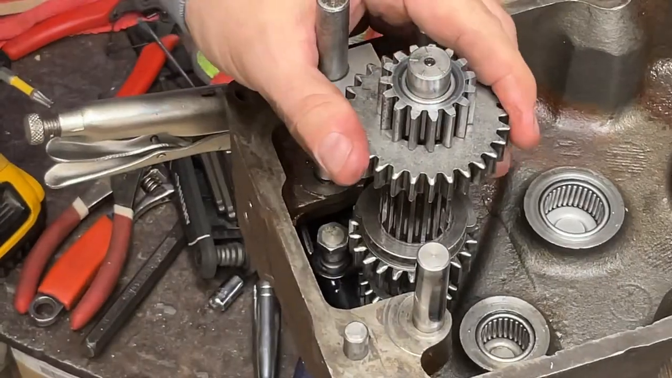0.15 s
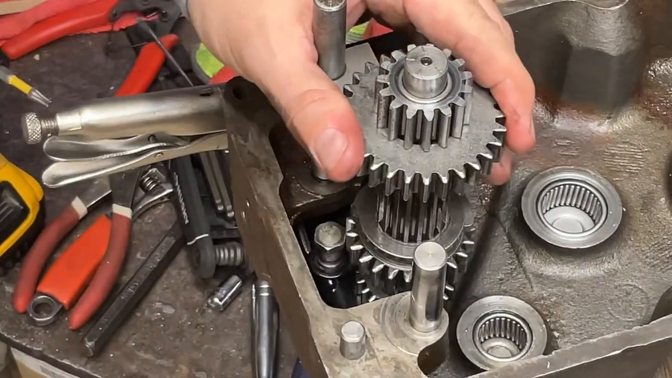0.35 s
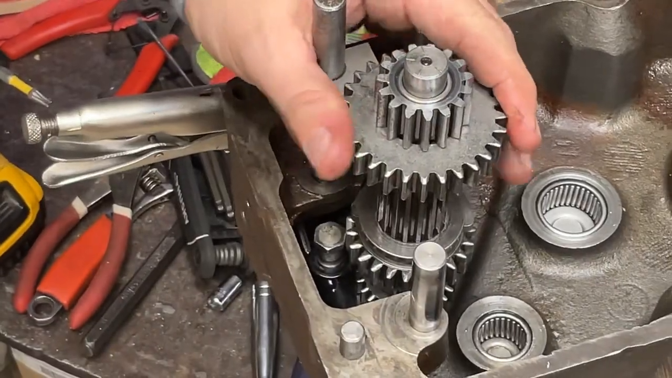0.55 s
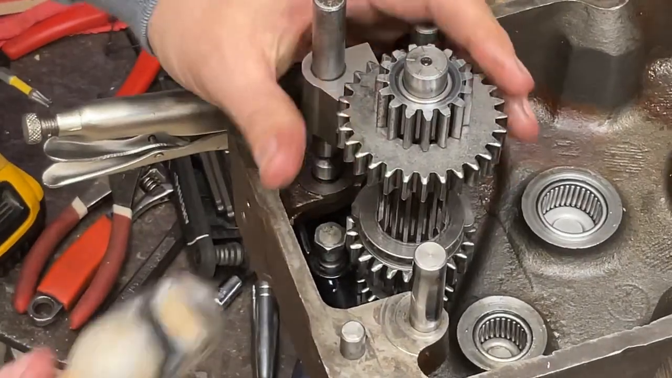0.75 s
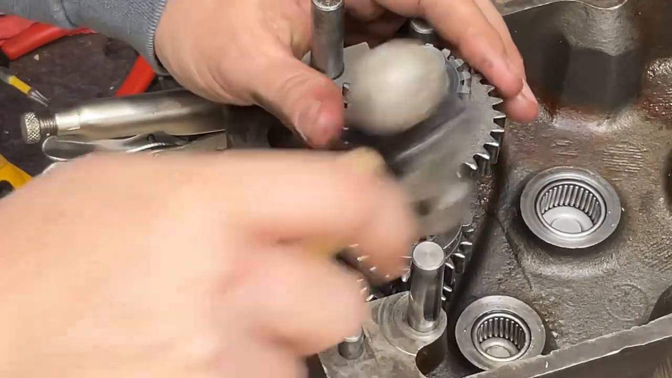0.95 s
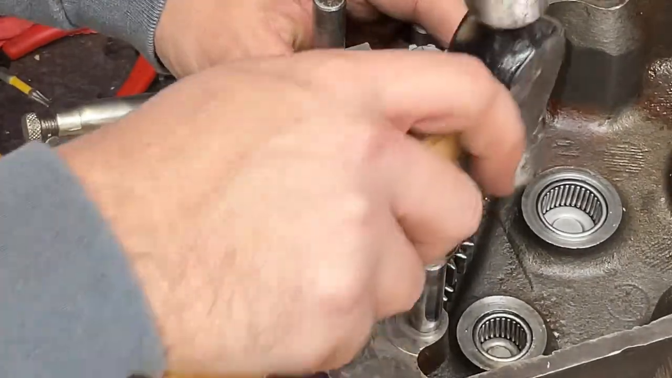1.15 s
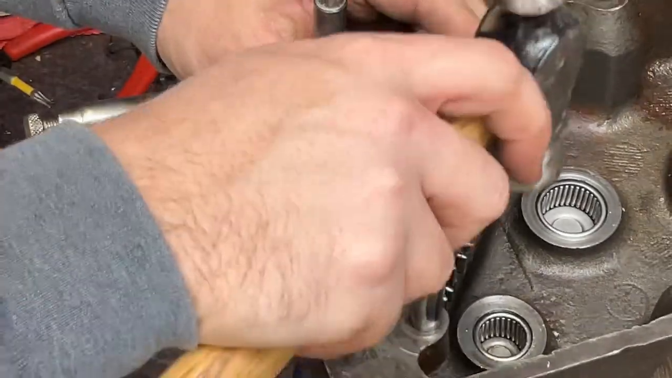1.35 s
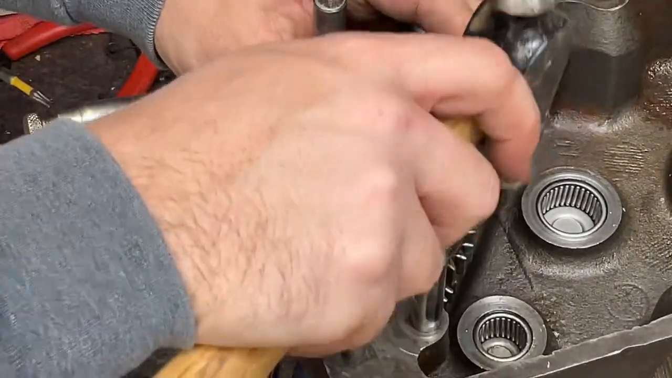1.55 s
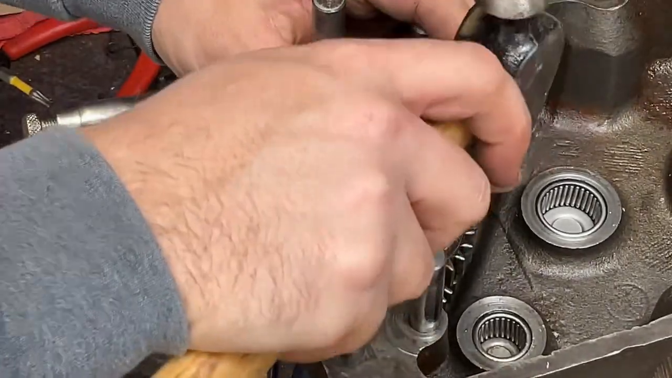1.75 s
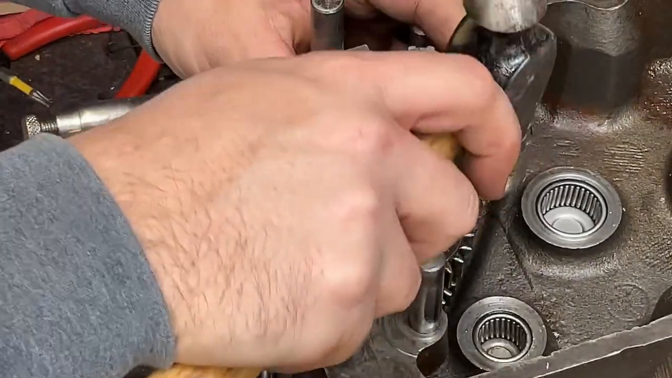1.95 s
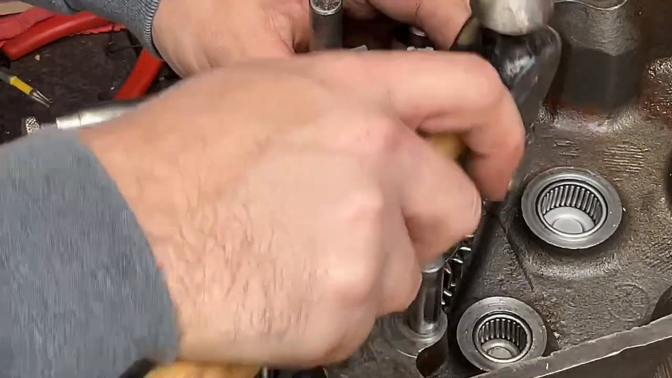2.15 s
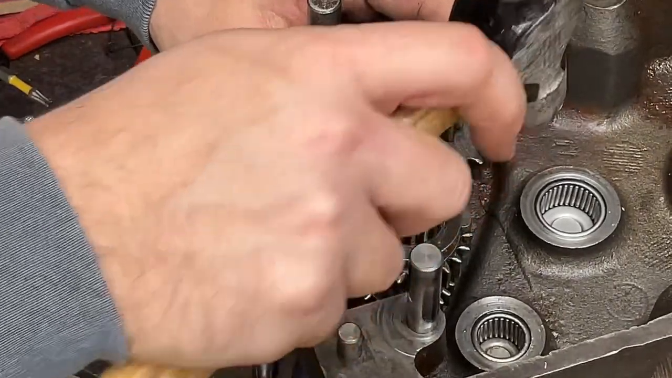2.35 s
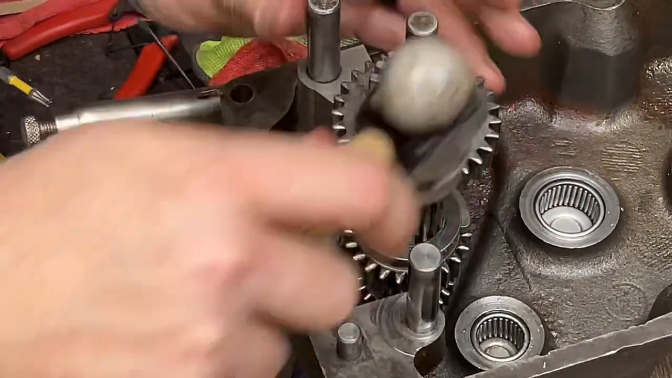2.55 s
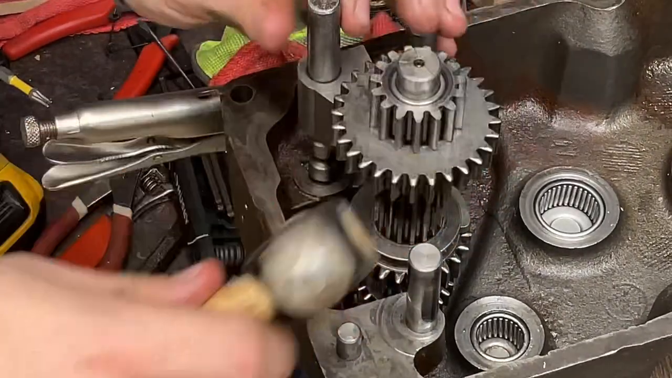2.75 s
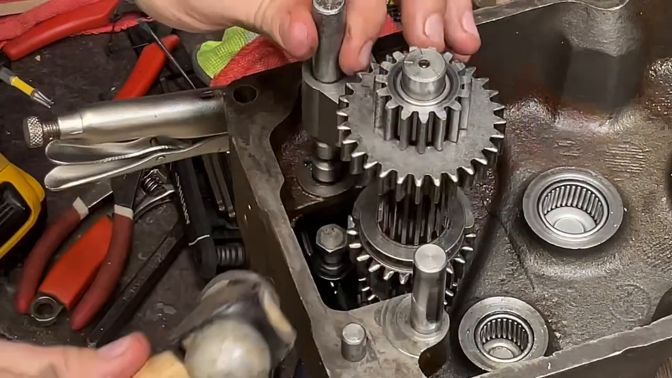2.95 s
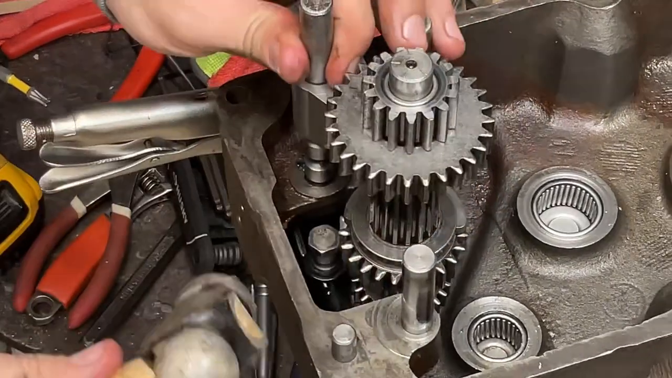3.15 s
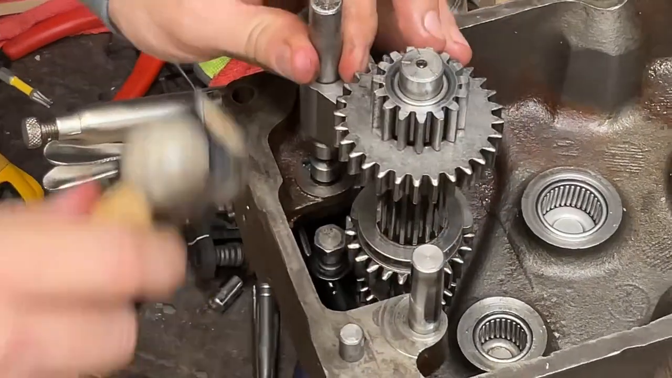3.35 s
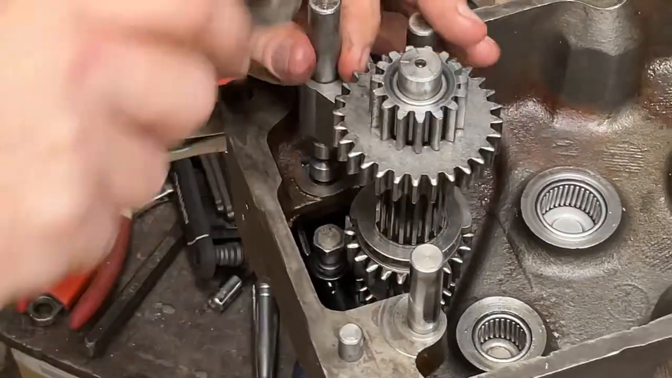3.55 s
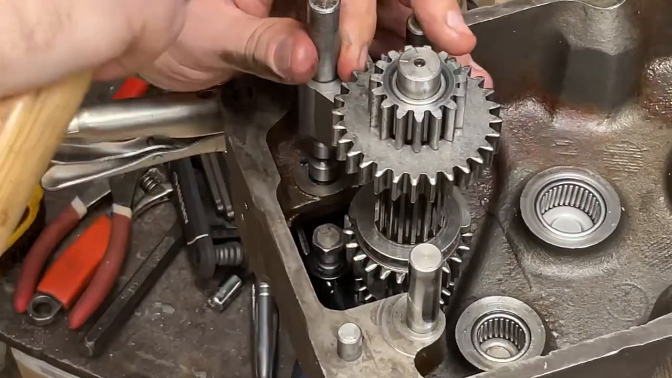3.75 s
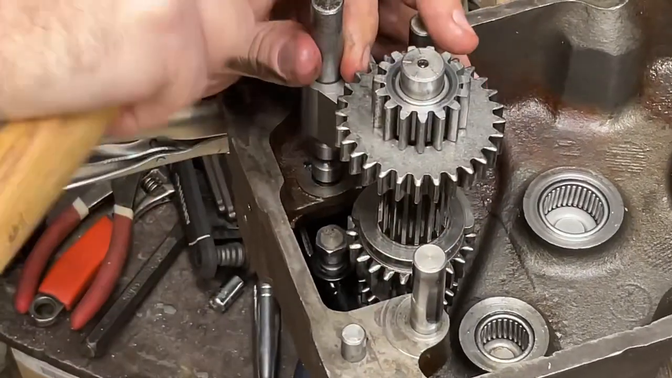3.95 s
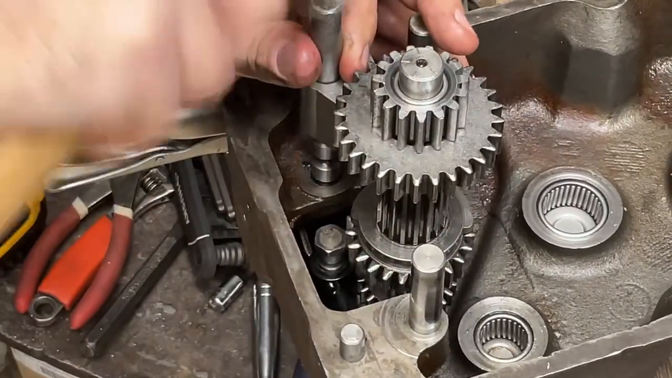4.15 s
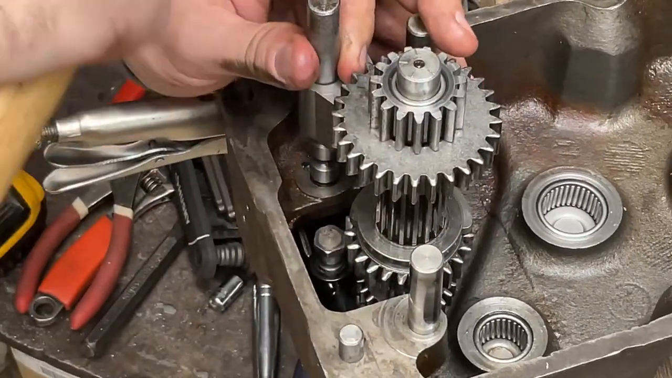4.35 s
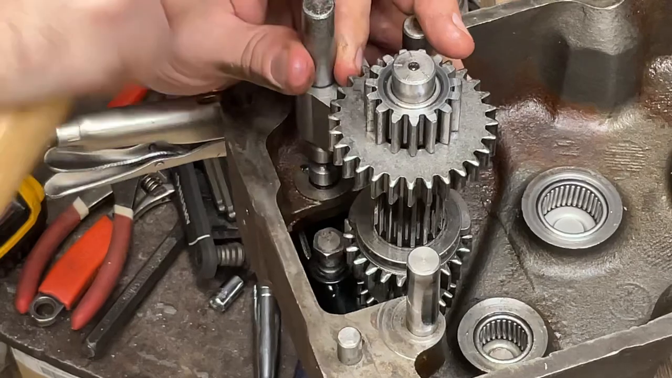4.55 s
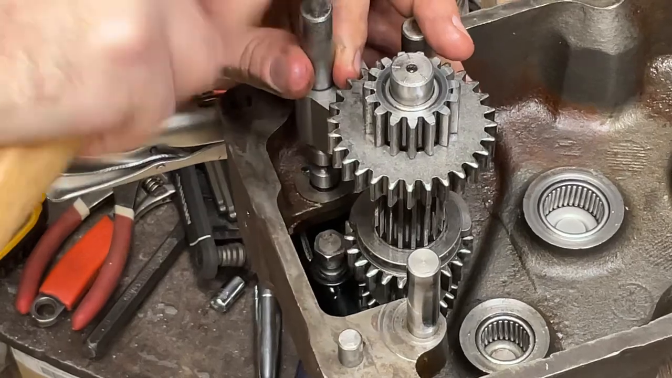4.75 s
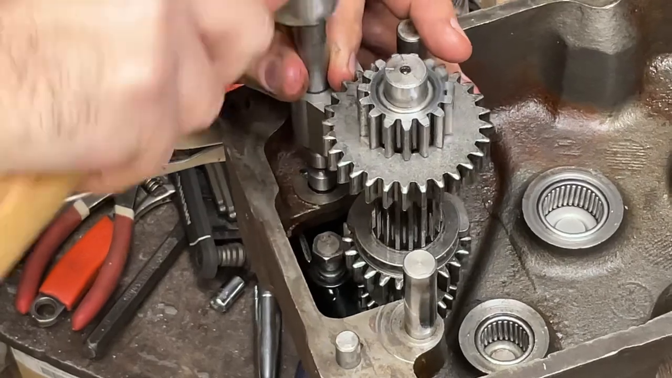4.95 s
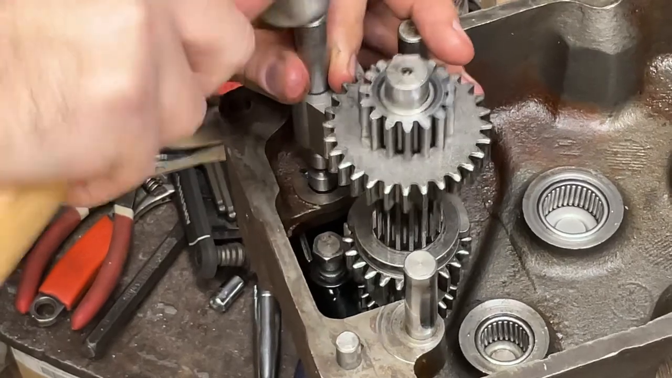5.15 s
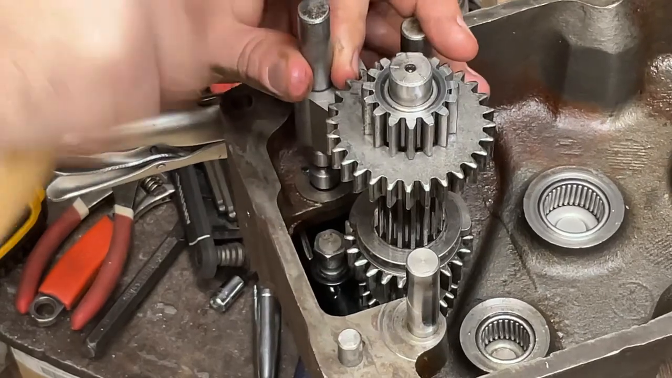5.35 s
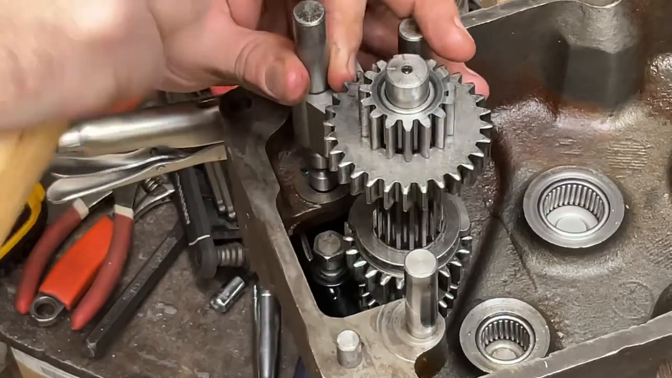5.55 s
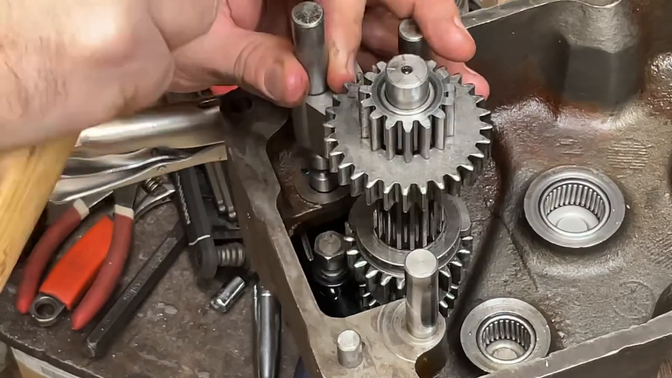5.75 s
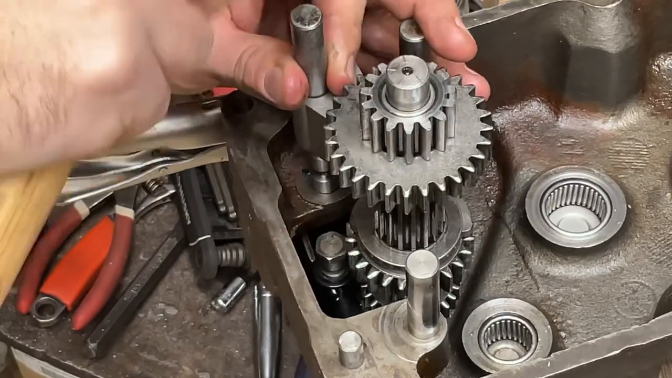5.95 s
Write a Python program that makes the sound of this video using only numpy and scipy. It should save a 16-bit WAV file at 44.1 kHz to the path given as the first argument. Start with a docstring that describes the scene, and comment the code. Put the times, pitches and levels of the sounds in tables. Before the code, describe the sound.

A hammer taps a steel gear shaft five times, then after dull hand bumps strikes a rod into a cast metal case with ten firm, even blows.

```python
"""A mains hum and room air fill a small workshop; a hammer lightly taps a steel gear shaft five times.
The hands shift on the case with dull bumps; the hum sinks under a brief low drone.
Ten firm blows then drive a shift rod into the cast gearbox case.
Each strike sums a shaped noise clank, decaying sines for case and steel, and a diffuse noise echo.
Hum and drone are sines; air and hands are coloured noise. The microphone adds narrow dips."""
import sys
import numpy as np
from scipy import signal
from scipy.fft import rfft, irfft, next_fast_len
from scipy.io import wavfile

SR = 44100
rng = np.random.default_rng(int(sys.argv[2]) if len(sys.argv) > 2 else 0)


def transcribe(signal):
    """Save signal, clipped to [-1, 1], as a 16-bit WAV file at the path in sys.argv[1]."""
    frames = np.atleast_2d(signal).T
    limited = np.clip(frames, -1, 1)
    pcm = np.round(limited * 32767).astype(np.int16)
    wavfile.write(sys.argv[1], SR, pcm)


N = 268569
T = np.arange(N) / SR
RING_T = T[:SR // 2]

# room air spectrum: (frequency [Hz], relative level [dB])
AIR_COLOUR = [(15, -26), (28, 3.5), (60, -0.5), (250, -4.5), (450, -5), (800, -11.5), (1500, -16),
              (2500, -25), (3600, -26), (4600, -34.5), (5600, -39.5), (7500, -45), (11000, -48),
              (16000, -52.5)]
# mains hum partials: (frequency [Hz], relative level [dB])
HUM_PARTIALS = [(120, 0.5), (240, -19.5), (252, -13), (360, -21.5)]
# light taps on the gear shaft: (time [s], level [dB], contact bite [dB], free ring of the steel [dB])
TAPS = [(1.2643, -17, -10, -47), (1.5116, -0.5, -2.5, -32.5), (1.7161, 2, 2, -44), (1.9272, 1, 6, -35.5),
        (2.1094, -2.5, 1.5, -47)]
# firm blows on the rod; more thud as it gives way further: (time [s], level [dB], thud [dB])
BLOWS = [(3.9156, 0, -2.5), (4.1941, 0.5, 1.1), (4.4490, -0.1, 2), (4.6974, 0.55, 2), (4.9373, 0.7, 0.5),
         (5.1741, 0.6, 0), (5.4044, 0.4, -0.3), (5.6266, 0.56, -1), (5.8429, 1.8, -8), (6.0526, 1.5, -3)]
# case modes struck through the gear shaft: (frequency [Hz], relative level [dB], t60 [s])
SHAFT_MODES = [(366, -38, .09), (1450, -42, .04), (2160, -32, .04), (2265, -32, .04), (2390, -34, .04),
               (2850, -35, .04), (3460, -34, .05), (3585, -32, .05), (3940, -34, .05), (4700, -35, .05),
               (5450, -32, .04), (6600, -41, .03)]
# case modes struck through the rod: (frequency [Hz], relative level [dB], t60 [s])
ROD_MODES = [(440, -25, .07), (502, -35, .1), (578, -33, .1), (634, -33, .11), (727, -33, .09),
             (805, -30, .1), (844, -35, .12), (911, -32, .1), (1072, -25, .08), (1500, -36, .1),
             (1757, -30, .11), (1862, -27, .13), (1938, -35, .12), (2300, -28, .05), (2590, -28, .09),
             (2665, -33, .08), (3160, -32, .08), (3520, -28, .04), (4420, -30, .07), (5290, -26, .03),
             (5900, -30, .04), (6480, -30, .05), (6750, -30, .05), (6885, -33, .08), (8880, -31, .03)]
# dense short-lived modes, via the gear shaft: (frequency [Hz], relative level [dB])
SHAFT_CLANK = [(60, -2.5), (130, -1), (400, 2.5), (900, -3.5), (1850, 1), (2150, 12), (2700, 6.5),
               (3600, 9), (4800, 5.5), (6500, -7.5), (8000, -10), (10500, -12.5), (13100, -0.5),
               (13700, -18), (16000, -18.5)]
# dense short-lived modes, via the rod: (frequency [Hz], relative level [dB])
ROD_CLANK = [(40, 3), (130, 10.4), (210, 10), (330, 14.9), (700, 18.4), (1300, 14), (2400, 17.6),
             (3600, 11.2), (5500, 8.3), (7500, 4.1), (9500, 4.6), (11500, 3.4), (13200, 4.1), (14100, 11.8),
             (15000, 1)]
# hammer head's own notes: (frequency [Hz], relative level [dB], t60 [s])
HAMMER_NOTES = [(3760, 20, .055), (10460, 0, .16)]
# gear shaft's own notes: (frequency [Hz], relative level [dB], t60 [s])
SHAFT_NOTES = [(11950, 0, .03)]
# rod's own notes: (frequency [Hz], relative level [dB], t60 [s])
ROD_NOTES = [(12330, 0, .035), (14150, -15, .1), (15350, -9, .025)]
# workshop echo: (frequency [Hz], relative level [dB], t60 before the linger factor [s])
ROOM_ECHO = [(101, 3.5, 0.26), (344, -5.5, 0.24), (760, -0.5, 0.29), (1970, -3.5, 0.3), (3730, -4, 0.29),
             (7800, -6.5, .23), (14000, -12.5, 0.22)]
# dull bumps of the hands on the case: (time [s], bell sigma [s], level [dB])
BUMPS = [(2.149, 0.016, -42.5), (3.286, .045, -46), (3.34, 0.026, -45.5)]
# spectra of the hand sounds: (frequency [Hz], relative level [dB])
BUMP_COLOUR = [(12, -15.5), (25, -0.5), (50, 3.5), (110, -3.5), (250, -18.5), (600, -37.5),
               (3000, -46.5), (10000, -80)]
BRUSH_COLOUR = [(200, -4), (600, 4), (1600, -4), (4000, -20), (9000, -30), (16000, -35)]
TOUCH_COLOUR = [(150, -7), (650, 4), (1400, -13), (3000, -28), (9000, -39)]
# microphone dips: (frequency [Hz], gain at the dip's centre [dB])
DIP_GAIN = [(1000, -25), (7100, -24), (8100, -3.5), (10200, -12)]

# the room air sinks with the hum
AIR_DB, AIR_DROP_DB = -60, -6
HUM_DB, HUM_DROP_DB, HUM_OFF_S, HUM_FADE_S = -57, -21, 3.53, 0.26
DRONE_HZ, DRONE_DB, DRONE_FROM_S, DRONE_TO_S, DRONE_FADE_S = 184, -64, 3.38, 3.86, 0.17
# the gear shaft clangs more with every tap; the hammer head rings below the shaft
TAP_THUD_DB, TAP_CLANG_DB, CLANG_DB_PER_TAP, HAMMER_UNDER_SHAFT_DB = 1.5, -4.5, 1.57, -13
# share of clank and echo power that repeats from strike to strike
REPEAT_SHARE = 0.38
# grip shift between the runs; lengths are bell sigmas
REGRIP_S, REGRIP_LENGTH_S, REGRIP_DB, REGRIP_UNEVEN_DB = 2.9, 0.53, -61, 4.5
BRUSH_S, BRUSH_LENGTH_S, BRUSH_DB = 3.47, .021, -61
TOUCH_S, TOUCH_T60_S, TOUCH_DB = 3.819, .2, -57.5
# the rod's play shrinks by 1 / e in this many blows
SEATING_BLOWS = 1.08
# (on the seated rod [dB], added by full play [dB])
ROD_CLANG_DB, ROD_BITE_DB, ROD_HAMMER_DB = (2, -3), (2.5, -13), (-70, 32)
# rod notes: final level, lack at the first blow, blows for that lack to shrink by 1 / e
ROD_NOTES_DB, ROD_MUTED_DB, RING_UP_BLOWS = -12.5, -38, 2.4
# dips at multiples of DIP_HZ; width grows with the multiple to the power DIP_WIDENING
DIP_HZ, DIP_COUNT, DIP_WIDTH_HZ, DIP_WIDENING = 1017, 10, 72, .7
TOP_HZ = 15750


def undb(db):
    """Decibels to amplitude gain."""
    return 10 ** (np.asarray(db) / 20)


def unit(x):
    """Scale to an energy of one."""
    return x / np.sqrt(np.sum(x ** 2))


def fade(t60_s):
    """Exponential decay over one ring, 60 dB down at t60."""
    return np.exp(-np.log(1000) * RING_T / t60_s)


def ramp(start_s, length_s):
    """Straight rise from zero to one."""
    return np.clip((T - start_s) / length_s, 0, 1)


def bell(middle_s, sigma_s):
    """Gaussian swell around one moment."""
    return np.exp(-.5 * ((T - middle_s) / sigma_s) ** 2)


def walk(rate_hz):
    """Slow random curve: normal draws at rate_hz, joined by straight lines."""
    points = N // 100
    return np.interp(T * rate_hz, np.arange(points), rng.standard_normal(points))


def colour(x, points):
    """Causal minimum-phase filter through (frequency [Hz], gain [dB]) points."""
    size = 2 * next_fast_len(len(x))
    hz, db = np.transpose(points)
    log_hz = np.log(np.fft.rfftfreq(size, 1 / SR) + 1)
    log_gain = np.log(undb(np.interp(log_hz, np.log(hz), db)))
    # folding the cepstrum makes the response causal
    cepstrum = irfft(log_gain)
    cepstrum[1:size // 2] *= 2
    cepstrum[size // 2 + 1:] = 0
    response = np.exp(rfft(cepstrum))
    return irfft(rfft(x, size) * response)[:len(x)]


def noise(points):
    """Coloured noise with an rms of one."""
    return unit(colour(rng.standard_normal(N), points)) * np.sqrt(N)


def room_air(gone):
    """Coloured noise with a wavering level that sinks as gone rises."""
    return noise(AIR_COLOUR) * undb(AIR_DB + AIR_DROP_DB * gone + .6 * walk(6))


def mains_hum(gone):
    """Sines wavering in level and phase, sinking as gone rises."""
    hum = np.zeros(N)
    for hz, db in HUM_PARTIALS:
        level = undb(db + .8 * walk(5))
        hum += level * np.sin(2 * np.pi * hz * T + hz / 900 * walk(4))
    return np.sqrt(2) * hum * undb(HUM_DB + HUM_DROP_DB * gone)


def low_drone():
    """One brief low sine with straight fades."""
    swell = ramp(DRONE_FROM_S, DRONE_FADE_S) - ramp(DRONE_TO_S - DRONE_FADE_S, DRONE_FADE_S)
    return np.sqrt(2) * undb(DRONE_DB) * swell * np.sin(2 * np.pi * DRONE_HZ * T)


def background():
    """Air and hum that sink together, with the drone around that moment."""
    gone = ramp(HUM_OFF_S, HUM_FADE_S)
    return room_air(gone) + mains_hum(gone) + low_drone()


def gear_taps():
    """Taps as (time [s], level, thud, clang, bite, hammer ring, shaft ring [dB])."""
    rows = []
    for k, (s, level_db, bite_db, ring_db) in enumerate(TAPS):
        clang_db = TAP_CLANG_DB + CLANG_DB_PER_TAP * k
        hammer_db = ring_db + HAMMER_UNDER_SHAFT_DB
        rows.append((s, level_db, TAP_THUD_DB, clang_db, bite_db, hammer_db, ring_db))
    return rows


def burst(grain, t60_s, spread):
    """Short shock: noise phases with a flat spectrum, then a slow fade."""
    phase = np.angle(rfft(grain * spread * fade(t60_s)))
    return unit(irfft(np.exp(1j * phase), len(grain)) * fade(10 * t60_s))


def ring(modes):
    """Decaying sines; each strike scatters their levels, pitches and signs anew."""
    hz, db, t60_s = np.transpose(modes)[:, :, None]
    scatter_db, detune, sign = rng.standard_normal((3, len(modes), 1))
    waves = np.sign(sign) * np.sin(2 * np.pi * hz * (1 + .001 * detune) * RING_T)
    return np.sum(undb(db + scatter_db) * fade(t60_s) * waves, axis=0)


def workshop(grain, gap_s, build_s, linger):
    """Diffuse echo of case, bench and walls: noise bands build up after a gap and decay."""
    hz, db, t60_s = np.transpose(ROOM_ECHO)
    log_hz = np.log(np.fft.rfftfreq(len(grain), 1 / SR) + 1)
    white = rfft(grain)
    build = 1 - np.exp(-np.maximum(RING_T - gap_s, 0) / build_s)
    echo = np.zeros(len(grain))
    for pick, band_db, band_t60_s in zip(np.eye(len(hz)), db, t60_s):
        band = irfft(white * np.interp(log_hz, np.log(hz), pick), len(grain))
        echo += undb(band_db) * band * unit(build * fade(linger * band_t60_s))
    return echo


def strike(rows, modes, clank, notes, clank_t60_s, spread_s, modes_db, echo_db, linger):
    """Hammer strikes on a shaft: dense clank, case modes, notes of the steel and room echo."""
    out = np.zeros(N + len(RING_T))
    usual = rng.standard_normal((2, len(RING_T)))
    # the shock takes a moment to spread from the shaft through the case
    spread = 1 - np.exp(-RING_T / spread_s)
    for s, level_db, thud_db, clang_db, bite_db, hammer_db, shaft_db in rows:
        # hand and hammer move between strikes, so clank and echo only partly repeat
        fresh = rng.standard_normal(usual.shape)
        clank_grain, echo_grain = np.sqrt(REPEAT_SHARE) * usual + np.sqrt(1 - REPEAT_SHARE) * fresh
        case = colour(burst(clank_grain, clank_t60_s, spread), clank)
        case = case + undb(modes_db) * spread * ring(modes)
        # a shaft that gives way thuds; a hard, square contact bites and also shakes the bench
        case = colour(case, [(90, bite_db), (250, 0.0019), (500, thud_db), (1000, thud_db),
                             (1800, 0.0064), (2700, 0.0027), (3600, clang_db), (5500, clang_db),
                             (8000, bite_db)])
        steel = undb(hammer_db) * ring(HAMMER_NOTES) + undb(shaft_db) * ring(notes)
        blow = undb(level_db) * (case + steel)
        room = workshop(echo_grain, gap_s=.004, build_s=0.0057, linger=linger)
        echo = signal.fftconvolve(blow, room)[:len(blow)]
        start = int(s * SR)
        out[start:start + len(blow)] += blow + undb(echo_db) * echo
    return out[:N]


def grip_bumps():
    """Low noise pushed by short bells and one long uneven rumble as the grip changes."""
    push = bell(REGRIP_S, REGRIP_LENGTH_S) * undb(REGRIP_DB + REGRIP_UNEVEN_DB * walk(27))
    for s, sigma_s, db in BUMPS:
        push += undb(db) * bell(s, sigma_s)
    return push * noise(BUMP_COLOUR)


def finger_brush():
    """Fingers brush along the rod: one short swell of noise."""
    return undb(BRUSH_DB) * bell(BRUSH_S, BRUSH_LENGTH_S) * noise(BRUSH_COLOUR)


def finger_touch():
    """A fingertip lands on the rod: dull noise with a sudden start and exponential decay."""
    decay = np.exp(-np.log(1000) * np.abs(T - TOUCH_S) / TOUCH_T60_S)
    return undb(TOUCH_DB) * (T > TOUCH_S) * decay * noise(TOUCH_COLOUR)


def rod_blows():
    """Blows in the form of gear_taps: as the rod seats, it bites harder and its notes come out."""
    rows = []
    for k, (s, level_db, thud_db) in enumerate(BLOWS):
        play = np.exp(-k / SEATING_BLOWS)
        clang_db, bite_db, hammer_db = (seated + loose * play for seated, loose
                                        in (ROD_CLANG_DB, ROD_BITE_DB, ROD_HAMMER_DB))
        notes_db = ROD_NOTES_DB + ROD_MUTED_DB * np.exp(-k / RING_UP_BLOWS)
        rows.append((s, level_db, thud_db, clang_db, bite_db, hammer_db, notes_db))
    return rows


def scene():
    """Background, taps, hands and blows; the taps die away a little sooner than the blows."""
    taps = strike(gear_taps(), SHAFT_MODES, SHAFT_CLANK, SHAFT_NOTES, clank_t60_s=0.036,
                  spread_s=.00015, modes_db=-1.0, echo_db=-2.5, linger=0.82)
    hands = grip_bumps() + finger_brush() + finger_touch()
    blows = strike(rod_blows(), ROD_MODES, ROD_CLANK, ROD_NOTES, clank_t60_s=0.043,
                   spread_s=0.00018, modes_db=-0.5, echo_db=-0.57, linger=0.9)
    return (background() + taps + hands + blows)[None]


def record(dry):
    """Microphone: a row of narrow dips, then a steep low-pass at TOP_HZ."""
    dip_hz, dip_db = np.transpose(DIP_GAIN)
    for k in range(1, DIP_COUNT + 1):
        hz, width_hz = k * DIP_HZ, DIP_WIDTH_HZ * k ** DIP_WIDENING
        band = signal.lfilter(*signal.iirpeak(hz, hz / width_hz, fs=SR), dry)
        dry = dry - (1 - undb(np.interp(hz, dip_hz, dip_db))) * band
    low_pass = signal.ellip(10, .2, 80, TOP_HZ, fs=SR, output="sos")
    return signal.sosfilt(low_pass, dry)


dry = scene()
out = record(dry)
transcribe(out)
```